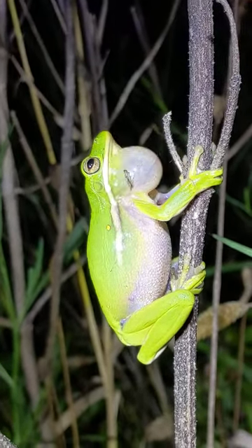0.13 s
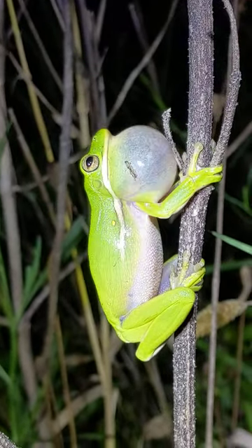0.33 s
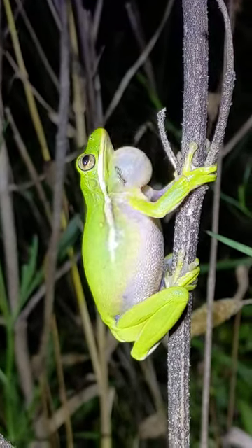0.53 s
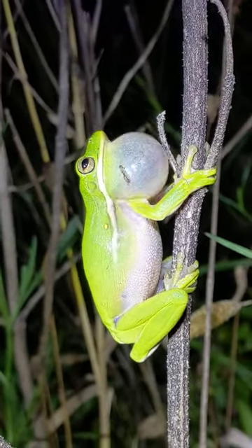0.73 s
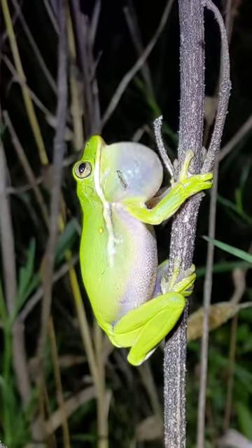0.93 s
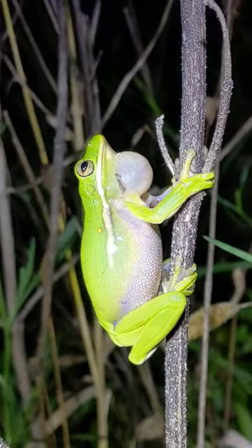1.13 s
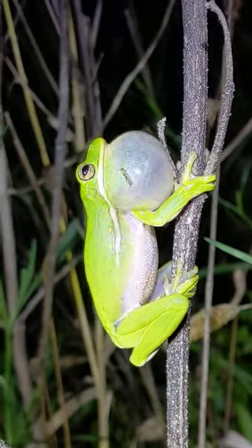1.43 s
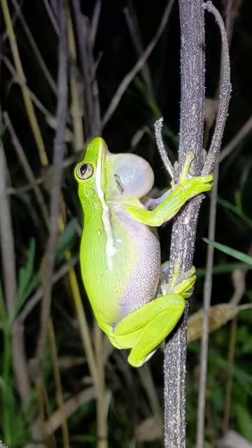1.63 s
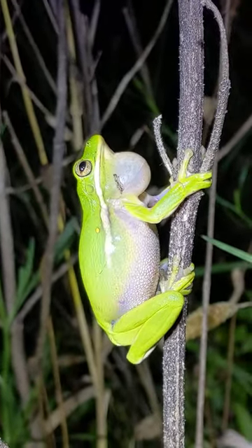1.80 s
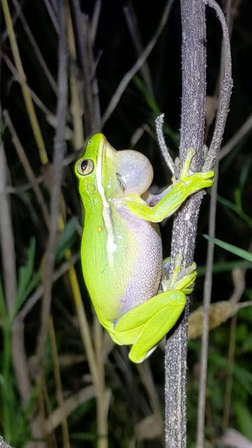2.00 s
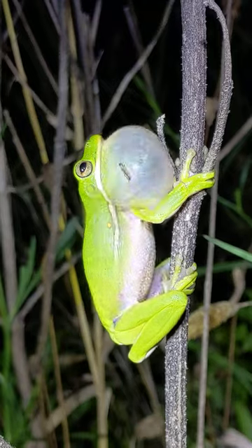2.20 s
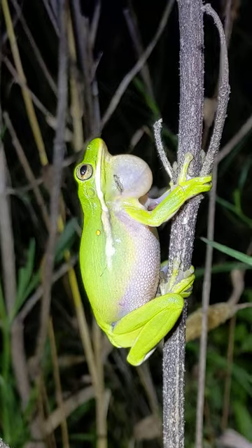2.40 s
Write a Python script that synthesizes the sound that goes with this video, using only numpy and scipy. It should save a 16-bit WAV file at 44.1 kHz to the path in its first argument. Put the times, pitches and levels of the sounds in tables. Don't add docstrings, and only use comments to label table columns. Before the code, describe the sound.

A tree frog gives four loud, short, nasal honks close by, over a faint distant frog chorus.

```python
import sys
import numpy as np
from scipy import signal
from scipy.fft import rfft, irfft, next_fast_len
from scipy.io import wavfile
from scipy.ndimage import uniform_filter1d

SR = 44100
rng = np.random.default_rng(int(sys.argv[2]) if len(sys.argv) > 2 else 0)


def log_audio(samples):
    frames = np.atleast_2d(samples).T
    limited = np.clip(frames, -1, 1)
    pcm = np.round(limited * 32767).astype(np.int16)
    wavfile.write(sys.argv[1], SR, pcm)


def gain_from_db(level_db):
    decades = np.asarray(level_db, float) / 20
    return 10 ** decades


N = 112454

FILL_S, SAG_PER_S = 0.028, 0.061
FADE_DB_PER_S, TAIL_DB_PER_S, THROAT_TAIL_DB_PER_S = -38.5, -350, -500

# t/s, delay/sac cycles, level/dB
STUMBLES = [
    (.3135, 1, 1.5),
    (.797, 1, 0),
    (.816, 1, 0),
    (.8665, 0, 4),
    (1.432, 1, 0),
    (1.4865, 0, -5),
    (2.209, 2, -3),
]


def pulse_times(opening, run, sac_hz):
    air_out, last_pulse = run[1:]
    flutter_ms = 5.5
    gaps_ms = (-flutter_ms, flutter_ms, *opening[1:])
    s = list(opening[0] + np.cumsum(gaps_ms) / 1000)
    db = [-19.5, -12, -2.5, -1.5, -.7, 0]
    while s[-1] < last_pulse:
        if len(s) < 6 + run[0]:
            cycles = 4
        elif s[-1] < air_out:
            cycles = 3
        else:
            cycles = 4.3
        period = (1 + SAG_PER_S * (s[-1] - s[0])) / sac_hz
        trips = [row for row in STUMBLES if s[-1] < row[0] <= s[-1] + 3 * period]
        _, late_cycles, pulse_db = trips[0] if trips else (0, 0.0012, 0.014)
        s.append(s[-1] + (cycles + late_cycles) * period)
        db.append(pulse_db)
    s = np.array(s)
    return s, db + FADE_DB_PER_S * (s - s[0]) + TAIL_DB_PER_S * np.maximum(s - air_out, 0)


def frog(openings, runs, levels_db, sacs_hz, throat, cut_hz):
    jitter_s, shimmer_db, ragged_db, wobble = 7e-6, .6, 5, 0.029
    climb_per_s = 0.22
    wheeze_hz, wheeze_db, wheeze_fall_hz_per_s, wheeze_after_s = 15050, -28.5, 22000, .075
    lead, span = SR // 10, np.arange(SR // 25)
    out = np.zeros(N + SR)
    for opening, run, level_db, sac_hz in zip(openings, runs, levels_db, sacs_hz):
        s, db = pulse_times(opening, run, sac_hz)
        chance = rng.standard_normal((80, 20))[:len(s)]
        age = s - s[0]
        full = 1 - np.exp(-(age / FILL_S) ** 1.63)
        breathless = np.clip((s - run[1] + 0.011) / 0.026, 0, 1)
        ragged = np.clip(1 - full + breathless, 0, 1)
        at = (s + jitter_s * chance[:, 0]) * SR + lead
        t = (span - (at % 1)[:, None] + 1) / SR
        rows = [*throat, (wheeze_hz, wheeze_hz, -90, wheeze_db, 6)]
        for k, (slack_hz, full_hz, slack_db, full_db, t60_ms) in enumerate(rows):
            hz = slack_hz + (full_hz - slack_hz) * full
            if k == 2:
                hz = hz + full_hz * climb_per_s * age
            hz = hz * (1 + wobble * (ragged + (hz > 5200) * 0.3) * chance[:, -1 - k % 6])
            ring_db = level_db + db + slack_db + (full_db - slack_db) * full
            ring_db = ring_db + (shimmer_db + (k > 0) * ragged_db * ragged) * chance[:, k + 1]
            if k > 0:
                ring_db = ring_db + THROAT_TAIL_DB_PER_S * np.maximum(s - run[1] - .006, 0)
            gain = gain_from_db(ring_db)
            if k == len(throat):
                hz = hz - wheeze_fall_hz_per_s * (age - wheeze_after_s)
                gain = gain * np.clip((age - wheeze_after_s) / .02, 0, 1)
            turns, rise_s = hz[:, None] * t, 0.00013
            if k == 0:
                def swing(a):
                    steady = sac_hz * (a - SAG_PER_S * a ** 2 / 2)
                    return steady + (full_hz - slack_hz) * FILL_S * np.exp(-a / FILL_S)
                turns = swing(age[:, None] + t) - swing(age[5])
                rise_s, gain = 0.00032, gain * gain_from_db(-21.5 * age)
            envelope = (1 - np.exp(-t / rise_s)) * gain_from_db(-60000 * t / t60_ms)
            rings = (-1) ** k * gain[:, None] * np.sin(2 * np.pi * turns) * envelope
            np.add.at(out, at.astype(int)[:, None] + span + 1, rings)
    high_pass = signal.butter(8, cut_hz, "high", fs=SR, output="sos")
    return signal.sosfilt(high_pass, out + 1e-18)[lead:lead + N]


def at_ports(x, ports):
    size = next_fast_len(N + 4096)
    f = np.arange(size // 2 + 1) * SR / size
    hz, db, lead = np.transpose([(0.00081, 0.0026, 0), *ports])
    tilt = gain_from_db(np.interp(f, hz, db) / 2)
    delay = np.exp(-1j * np.interp(f, hz, lead))
    spectrum = rfft(x, size)
    left, right = irfft(spectrum * tilt, size), irfft(spectrum / tilt * delay, size)
    return np.array([left, right])[:, :N]


# t/s of first pulse, then four gaps/ms
OPENINGS = [
    (.2266, 9, 8.3, 5.15, 3.95),
    (.7686, 8.2, 8.9, 4.05, 4.8),
    (1.3905, 8.9, 8.2, 4.0, 4.0),
    (2.1208, 2.92, 11.5, 6.8, 5.0),
]
# count of four-cycle gaps, t/s air runs out, t/s of last pulse
RUNS = [(2, .356, .372), (3, .884, .898), (3, 1.521, 1.533), (4, 2.249, 2.259)]
HONK_DB = [-10.5, -10.5, -11, -10.5]
SAC_HZ = [1014, 1009.6, 1015, 1017]
# slack f/Hz, full f/Hz, slack level/dB, full level/dB, 60 dB decay/ms
THROAT = [(980.6, 1021.4, 9, -1, 27.1), (1796, 1179, 2.5, 5.5, 5.16), (2490, 2716, -1.5, 9, 14.6),
          (3380, 3431, -12, 3, 7.27), (4050, 4570, -19.5, -5.5, 9.3), (5300, 5850, -17.5, -19, 8.4),
          (6900, 7066, -45, -16.5, 12.7), (9200, 9100, -48, -25.5, 8.8), (10300, 10400, -50.5, -34, 7.1),
          (2060, 2403, -5.5, -3, 23.6), (12000, 11800, -67, -44.5, 3.6)]
# f/Hz, left over right level/dB, left lead/rad
PORTS = [(1020, 0.5, 1.156), (1180, -0.9, 1.21), (1960, 6, 2.47), (2216, -3, 2.27), (2690, -2.5, 3.4),
         (3060, -1.5, 4.19), (3595, 1, 5.11), (4990, 1.5, 6.16), (6730, 2.5, 14.27)]


def near_frog():
    voice = frog(OPENINGS, RUNS, HONK_DB, SAC_HZ, THROAT, 920)
    return at_ports(voice, PORTS) + blips() + echoes(voice)


# t/s, level/dB
BLIPS = [(0.2508, -10), (0.2545, -8.5), (0.258, -7.5), (0.262, -1.5), (0.2732, -13), (.3165, -9.5),
         (2.2125, -13.5), (.797, 1), (.805, -3), (0.8091, -5.5), (0.819, 0.5), (1.4208, -9), (1.4248, -1),
         (1.4288, -4), (1.4356, -2.5), (2.1481, -9.5), (2.152, -6.5), (2.1556, -4.5), (2.1595, -8),
         (2.1636, -2.5)]


def blips():
    thump_db, thump_hz = -26.5, 430
    out, t = np.zeros((2, N)), np.arange(-200, 200) / SR
    for s, db in BLIPS:
        start = int(s * SR) - 200
        bump = np.exp(-(2 * np.pi * thump_hz * t) ** 2)
        out[:, start:start + 400] += gain_from_db(thump_db + db - np.array([[0], [13]])) * bump
    return out


# delay t/s, level/dB
ECHOES = [
    (.021, -58.5),
    (.038, -47.5),
    (.077, -39.5),
]


def echoes(x):
    out, dull = np.zeros((2, N)), signal.lfilter([.3], [1, -.7], x)
    for k, (s, db) in enumerate(ECHOES):
        for side in range(2):
            lag = int((s + 0.00123 * side * (-1) ** k) * SR)
            out[side, lag:] += gain_from_db(db) * dull[:-lag]
    return out


# t/s of first pulse, then four gaps/ms
NEIGHBOUR_OPENINGS = [
    (-.033, 6, 6, 5, 4.9),
    (1.9765, 5.6, 7.3, 5, 4.5),
]
# count of four-cycle gaps, t/s air runs out, t/s of last pulse
NEIGHBOUR_RUNS = [(0, .05, .062), (0, 2.055, 2.066)]
NEIGHBOUR_DB = [-40.5, -38.5]
NEIGHBOUR_SAC_HZ = [829, 838]
# slack f/Hz, full f/Hz, slack level/dB, full level/dB, 60 dB decay/ms
NEIGHBOUR_THROAT = [(818, 825, 7, -1.5, 27.8), (1290, 1240, 6, -2.5, 8.9), (1820, 1830, -4, -10.5, 16),
                    (2160, 2000, -4, -3.5, 27), (2520, 2800, -12, 3, 15.6), (4020, 4130, -17, -3.5, 12)]
# f/Hz, left over right level/dB, left lead/rad
NEIGHBOUR_PORTS = [(820, 1.8, 0.31), (2030, 2.9, 1.5), (2810, 4.9, 2.4), (4100, 1, 0.61)]


def neighbour():
    voice = frog(NEIGHBOUR_OPENINGS, NEIGHBOUR_RUNS, NEIGHBOUR_DB, NEIGHBOUR_SAC_HZ, NEIGHBOUR_THROAT, 790)
    return at_ports(voice, NEIGHBOUR_PORTS)


# t/s, peak level/dB, left over right level/dB
TRILL = [(0.964, -56.5, -12), (1.007, -56.5, -6), (1.0473, -55, 1.5), (1.0894, -52, -4), (1.131, -49, 0.0),
         (1.163, -47, 3), (1.1938, -43.5, -3), (1.2255, -43.5, -3), (1.259, -41.5, -4), (1.2933, -42.5, -3),
         (1.3277, -42, -4), (1.365, -38.5, -3)]


def trill():
    rise_hz_per_s, chirp_s = 23000, 0.0069
    out, t = np.zeros((2, N)), np.arange(-600, 600) / SR
    for s, db, pan_db in TRILL:
        for late, hz, change_db in [(.004, 1297, 0), (0.009 + 0.018, 1464, -6.5)]:
            turn = 2 * np.pi * (hz * rng.normal(1, 0.031) * t + rise_hz_per_s * t ** 2 / 2)
            gain = gain_from_db(db + change_db + np.array([[.5], [-.5]]) * pan_db)
            i = int((s + late) * SR) - 600
            out[:, i:i + 1200] += gain * np.exp(-(t / chirp_s) ** 2) * np.sin(turn + [[0], [.6]])
    return out


def rms_one(x):
    return x / np.sqrt(np.mean(x ** 2) + 1e-20)


# t/s, length/s, f/Hz, width/octaves, level/dB
RUSTLES = [(0.166, 0.025, 12000, .6, -54.5), (.535, 0.048, 9250, 0.42, -56.5),
           (0.784, 0.056, 8700, 0.39, -55), (1.128, 0.06, 9500, 0.38, -65),
           (1.278, 0.052, 12600, .5, -73.5), (2.387, 0.018, 12400, 0.55, -57),
           (0.018, 0.052, 9100, .5, -63.5)]
# t/s, level/dB, left over right level/dB
SNAPS = [
    (2.0226, -45, 12),
    (2.0533, -29.5, -23.5),
]


def leaves():
    out, t = np.zeros((2, N)), np.arange(N) / SR
    for s, length, hz, octaves, db in RUSTLES:
        band = [hz * 2 ** (-octaves / 2), min(hz * 2 ** (octaves / 2), 17000)]
        band_pass = signal.butter(2, band, "band", fs=SR, output="sos")
        hiss = rms_one(signal.sosfilt(band_pass, rng.standard_normal((2, N))))
        out += gain_from_db(db + np.array([[2.0], [-2.0]])) * hiss * np.exp(-((t - s) / length) ** 2)
    for s, db, pan_db in SNAPS:
        u = (t - s) / 0.00013
        click = u * np.exp(-u ** 2 / 2) + 0.28 * np.exp(-(u * 5) ** 2)
        out += gain_from_db(db + np.array([[.5], [-.5]]) * pan_db) * click
    return out


def drift(rate):
    r = np.exp(-80 * np.pi * rate / SR)
    slow = signal.lfilter([1], [1, -2 * r, r * r], rng.standard_normal(N // 40 + 2002))[2000:]
    return np.interp(np.arange(N) / 40, np.arange(len(slow)), rms_one(slow))


def resonance(x, hz, width_hz):
    r = np.exp(-np.pi * width_hz / SR)
    poles = [1, -2 * r * np.cos(2 * np.pi * hz / SR), r * r]
    return signal.lfilter([(1 - r * r) / 2, 0, (r * r - 1) / 2], poles, x)


def ringing_noise(hz, width_hz):
    once = resonance(rng.standard_normal((2, N)), hz, width_hz)
    return rms_one(resonance(once, hz, width_hz))


# f/Hz, likeness (1 = same)
LIKENESS = [(60, 0.96), (240, 0.8), (950, 0.19), (3770, 0.0033), (15000, 0.087)]


def banded_noise(spectrum, patchy_db, count):
    hz, db = np.transpose(spectrum)
    like_hz, likeness = np.transpose(LIKENESS)
    edges = np.geomspace(hz[0], hz[-1], count)
    out, white = 0, rng.standard_normal((2, 2, N))
    for k, (low, high) in enumerate(zip(edges, edges[1:])):
        band_pass = signal.butter(2, [low, high], "band", fs=SR, output="sos")
        mid, side = signal.sosfilt(band_pass, white[k % 2])
        centre = np.log(low * high) / 2
        alike = np.clip(np.interp(centre, np.log(like_hz), likeness), -1, 1)
        gain = gain_from_db(np.interp(centre, np.log(hz), db) + patchy_db * drift(16))
        out = out + gain * (np.sqrt(1 + alike) * mid + np.sqrt(1 - alike) * side * [[1], [-1]])
    return rms_one(out)


# f/Hz, level/dB per Hz
CHORUS = [(290, -53.5), (500, -25.5), (1220, -10), (1650, -9), (3200, -5.5), (5290, -5), (6950, -49),
          (10400, -23), (15600, -24)]
# f/Hz, width/Hz, level/dB
CHORUS_RINGS = [(2600, 660, -1.5), (3197, 470, 0.5), (4660, 580, -4.5)]
# t/s, level/dB
CHORUS_LEVEL = [(0, -52), (0.701, -51), (1.0, -52), (1.25, -47), (1.599, -53.5), (2.001, -49),
                (2.55, -51.5)]


def chorus():
    wide, rings = banded_noise(CHORUS, patchy_db=0.9, count=17), 0
    for hz, width, db in CHORUS_RINGS:
        flicker_db = 3.5 * np.array([drift(12.5), drift(14)])
        rings = rings + gain_from_db(db + flicker_db) * ringing_noise(hz, width)
    level_db = np.interp(np.arange(N) / SR, *np.transpose(CHORUS_LEVEL))
    return gain_from_db(level_db) * (wide + gain_from_db(-3.0) * rings)


def cricket():
    return gain_from_db(-73.5 + np.array([[1.5], [-1.5]])) * ringing_noise(8515, 160)


# f/Hz, level/dB per Hz
RUMBLE = [(13, -45.5), (22, -2.5), (113, 1), (173, -16.5), (331, -10.5), (370, -15.5), (600, -35),
          (780, -52), (1320, -120)]


def rumble():
    return gain_from_db(-63.5) * banded_noise(RUMBLE, patchy_db=2.0, count=10)


def scene():
    return near_frog() + neighbour() + trill() + leaves() + chorus() + cricket() + rumble()


def top_cut(x):
    return signal.sosfilt(signal.butter(12, 15710, fs=SR, output="sos"), x)


def record(dry):
    duck_from_db, duck_share, release_db_per_s, attack_s = -17.5, 0.42, 9.5, 0.012
    ramp = release_db_per_s * np.arange(N) / SR
    level_db = 10 * np.log10(uniform_filter1d(np.mean(dry ** 2, axis=0), size=400) + 1e-12)
    held_db = np.maximum.accumulate(level_db + ramp) - ramp
    r = np.exp(-1 / (attack_s * SR))
    duck_db = signal.lfilter([1 - r], [1, -r], duck_share * np.maximum(held_db - duck_from_db, 0))
    mix = np.clip(dry * gain_from_db(-duck_db), -.72, .72)
    return top_cut(mix)


dry = scene()
out = record(dry)
log_audio(out)
```